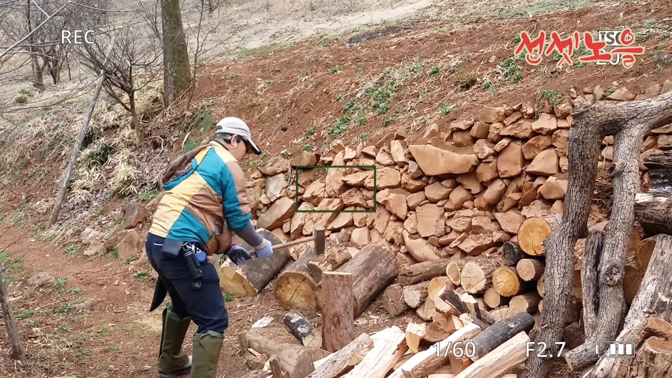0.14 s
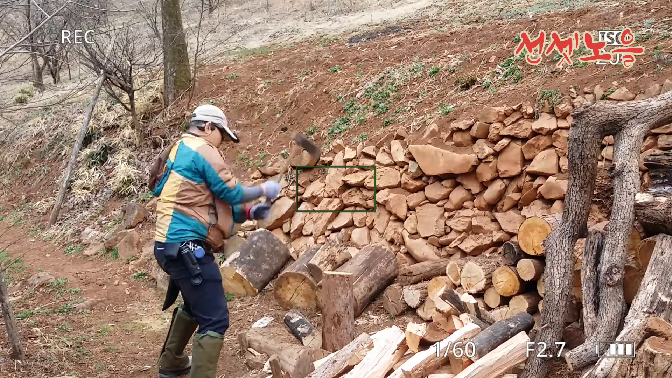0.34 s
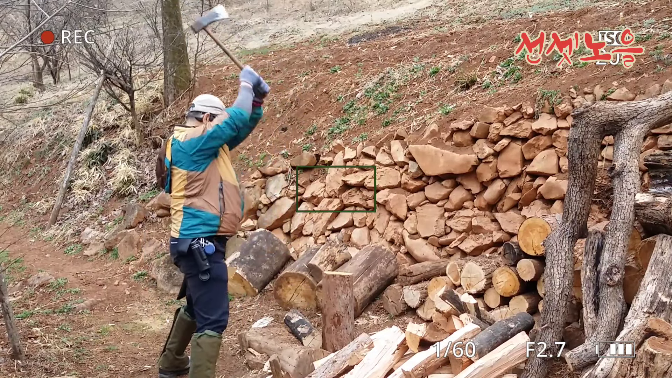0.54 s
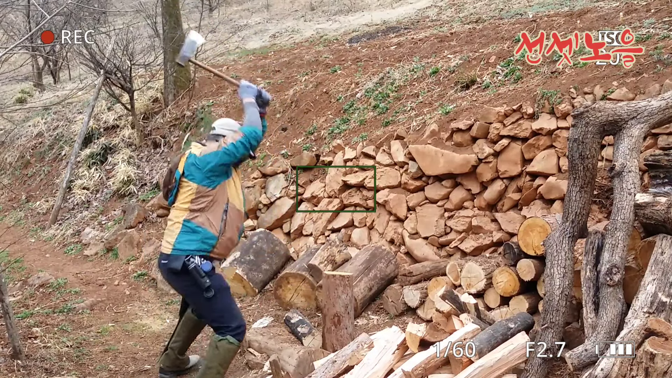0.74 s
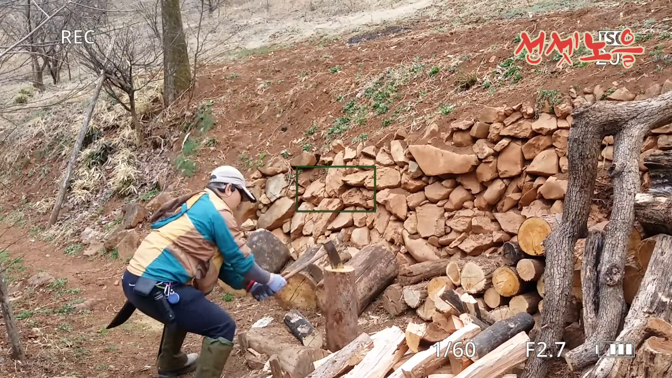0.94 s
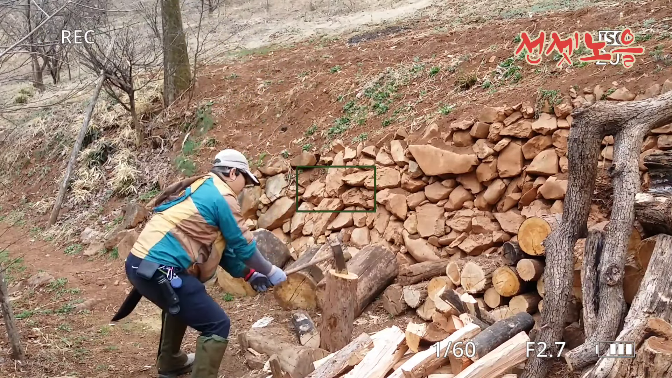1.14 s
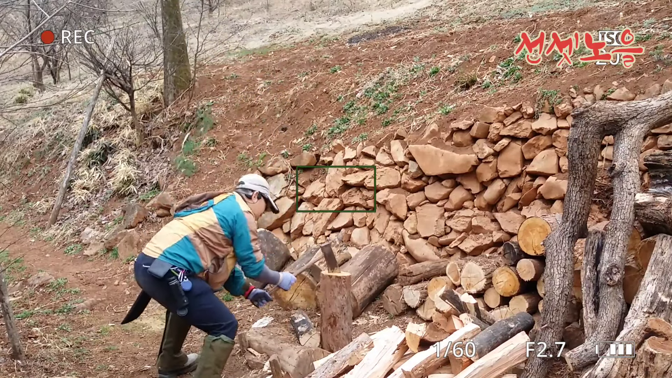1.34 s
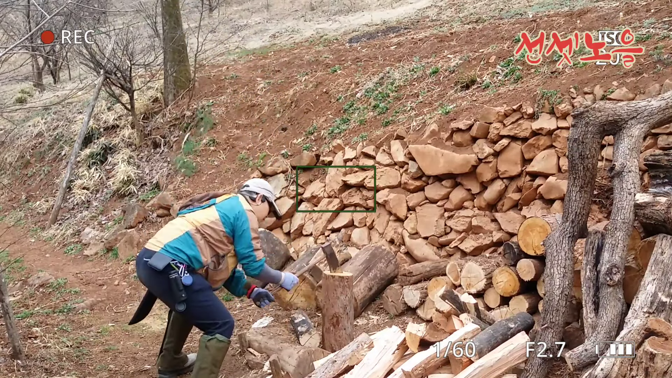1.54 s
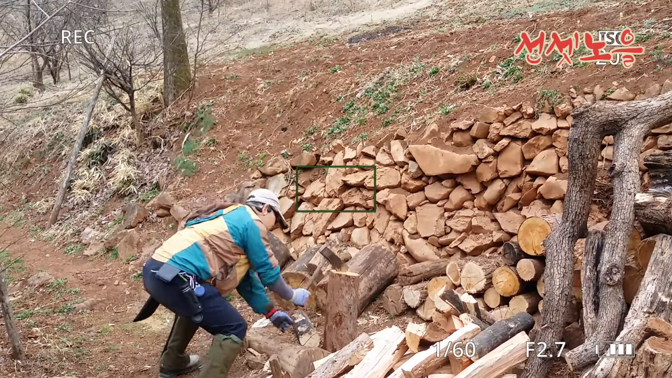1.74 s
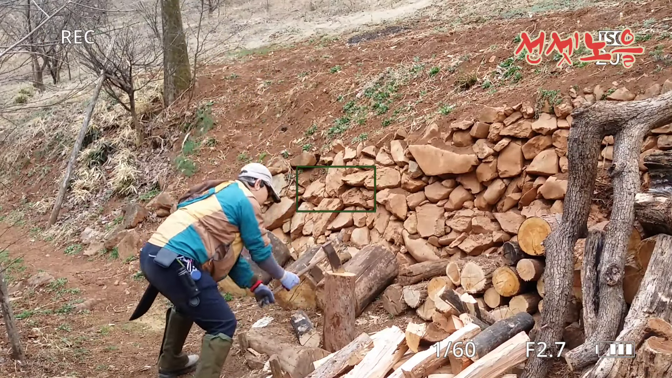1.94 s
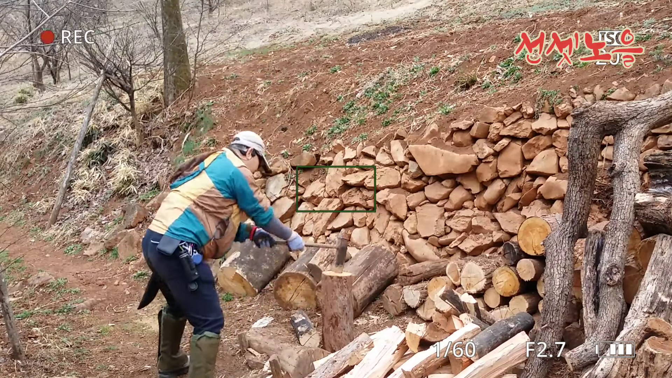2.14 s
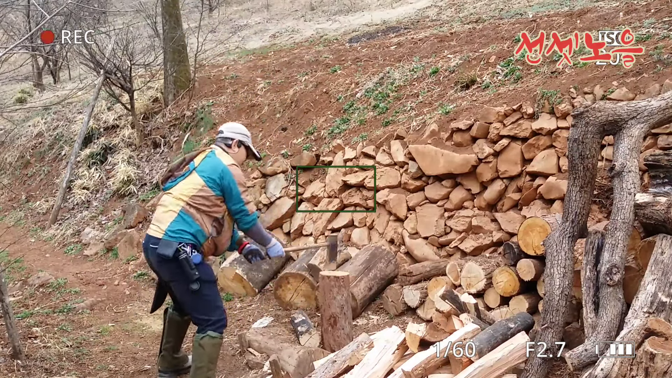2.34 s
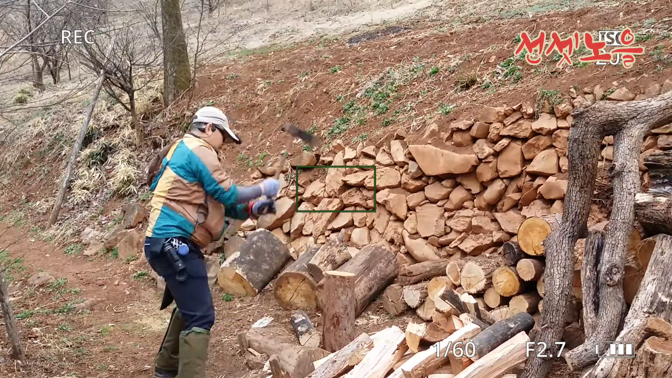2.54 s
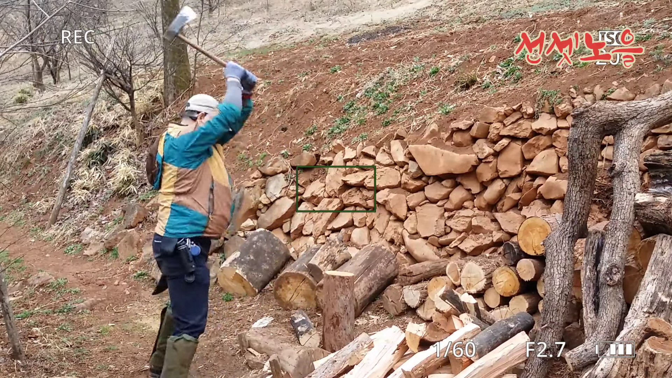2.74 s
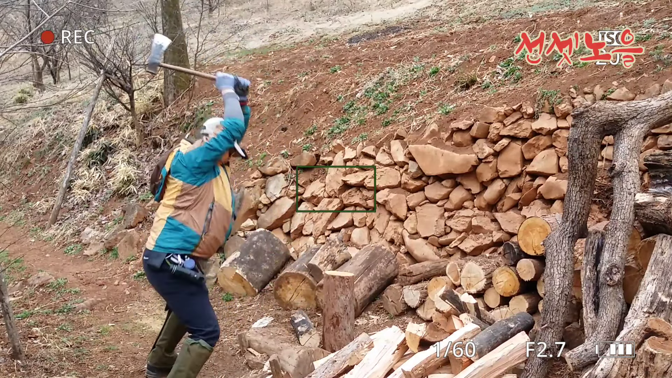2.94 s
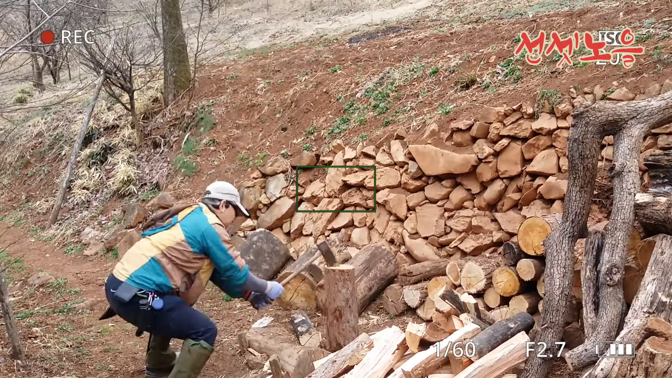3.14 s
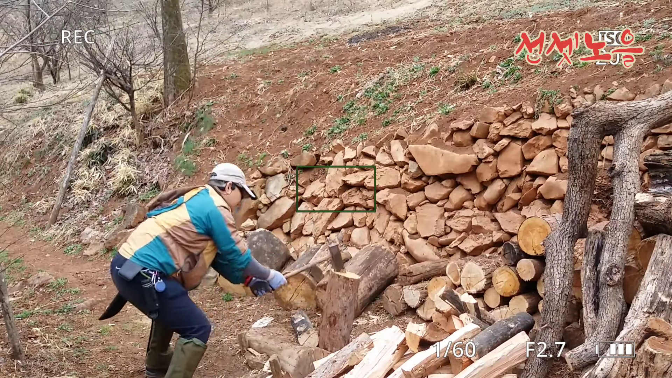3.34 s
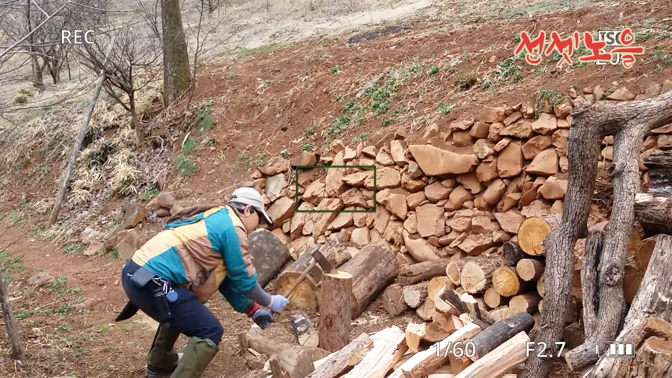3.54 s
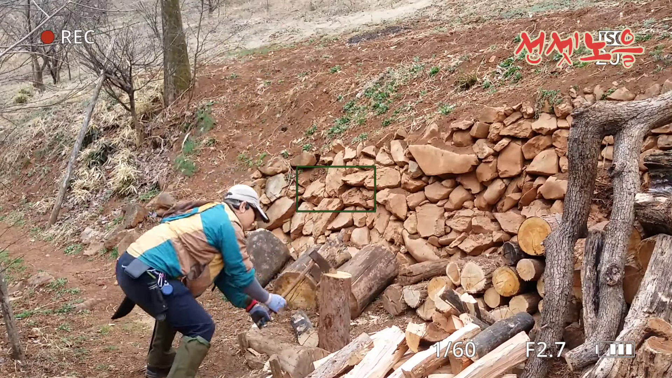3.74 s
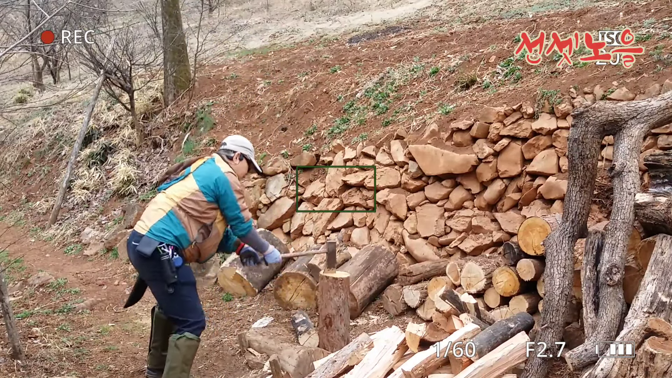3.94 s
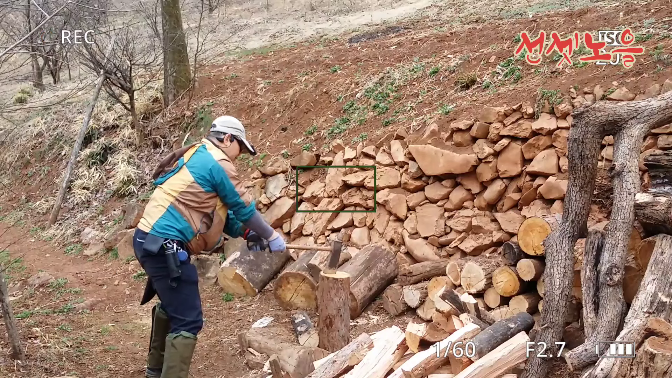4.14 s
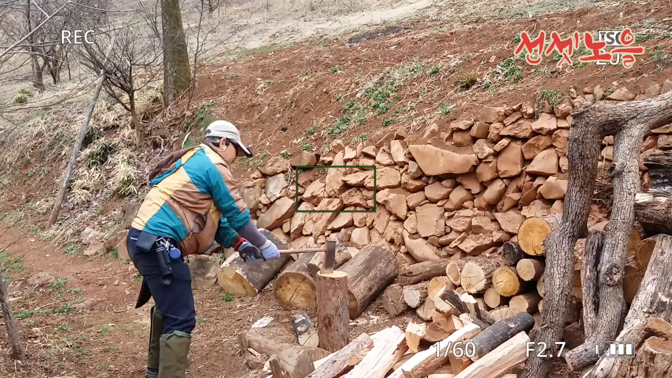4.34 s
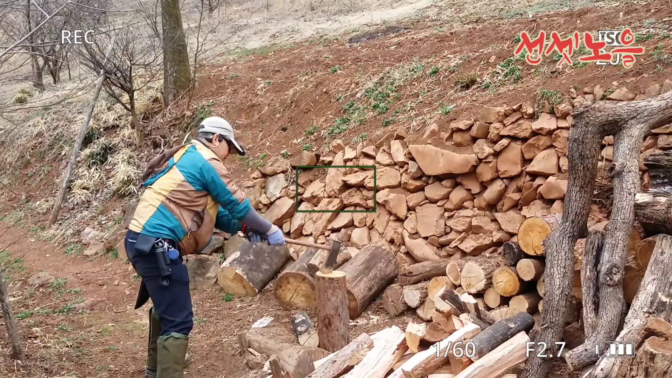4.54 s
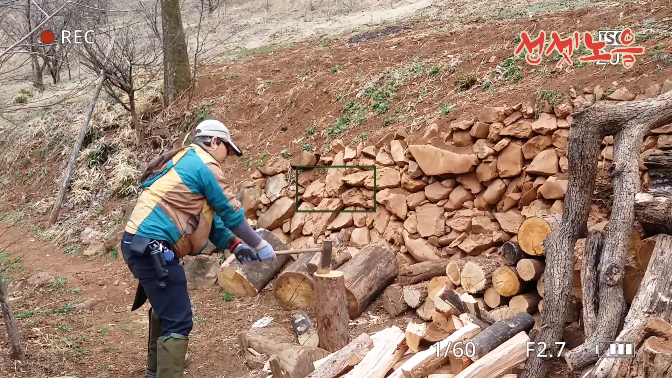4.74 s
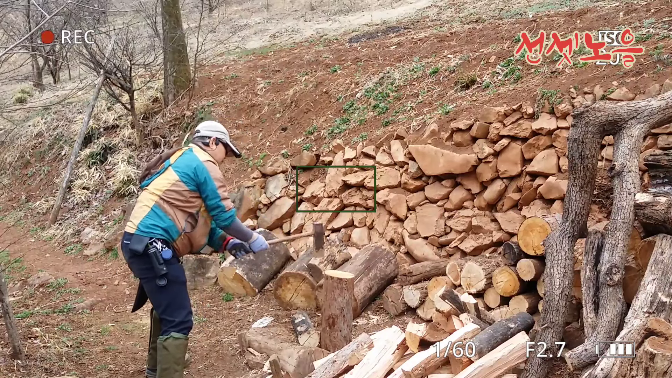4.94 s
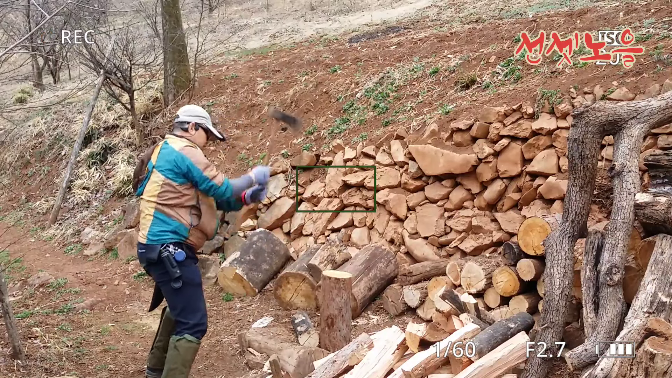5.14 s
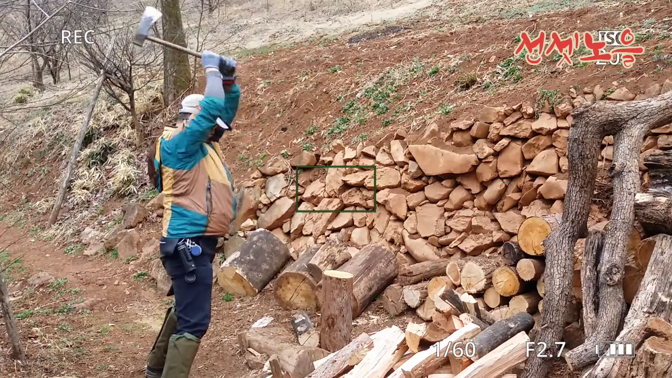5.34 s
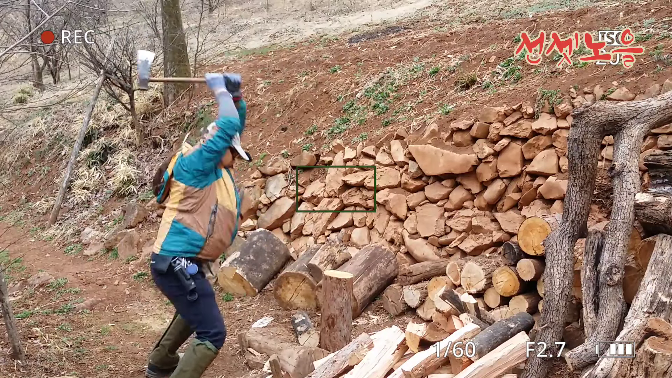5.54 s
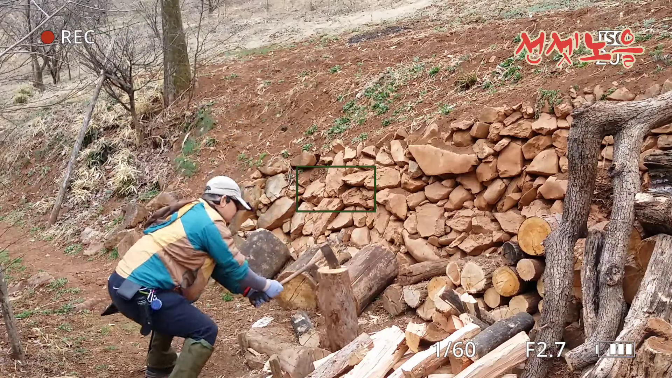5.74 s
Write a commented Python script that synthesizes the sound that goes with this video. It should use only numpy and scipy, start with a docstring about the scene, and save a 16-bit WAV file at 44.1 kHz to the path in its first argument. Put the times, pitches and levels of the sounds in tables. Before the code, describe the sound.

Three sharp axe chops crack through logs in quiet open air, as split pieces drop and wood is handled.

```python
"""Soft puffs of wind and a rustling jacket come first, then an axe splits firewood with three loud blows.
Each blow is a crack of tearing grain, a knock from the log and a thud from the chopping block.
Split halves drop, pieces of wood clack and scrape as they are handled, a foot steps softly, and the
woodpile and slope scatter the sound back. A faint whistle and a squeak pass, and the handle whooshes
on the last swing. The blows overload a small, bright-sounding microphone."""
import sys
import numpy as np
from scipy import signal
from scipy.fft import rfft, irfft, next_fast_len
from scipy.io import wavfile
from scipy.ndimage import map_coordinates

SR = 44100
rng = np.random.default_rng(int(sys.argv[2]) if len(sys.argv) > 2 else 0)


def pcm_store(signal):
    """Save signal as 16-bit PCM."""
    levels = np.round(np.clip(np.atleast_2d(signal), -1, 1) * 32767)
    wavfile.write(sys.argv[1], SR, levels.astype(np.int16).T)


N = 255780

# The tone colour of each noise. Each row: frequency in Hz, relative level in dB.
AIR_COLOUR = [(25, -7), (60, -5.5), (120, -2), (250, -3.5), (450, -11), (800, -15.5), (1700, -23),
              (3500, -21), (5200, -20), (6900, -12.5), (9000, -20.5), (12000, -21.5), (15500, -22.5)]
WIND_COLOUR = [(15, -37.5), (25, -2.5), (97, -0.5), (181, -14), (205, -21.5), (284, -21), (500, -35.5),
               (650, -59), (1100, -120)]
CLOTH_COLOUR = [(120, -30), (200, -2), (1110, -6.5), (1240, -7), (1480, -9), (3830, -11), (5720, -9.5),
                (7240, -1), (8080, -5), (14500, -15), (15600, -21.5)]
CLICK_COLOUR = [(150, -44), (500, -34), (1300, -13.5), (2200, -14), (3200, -11.5), (5500, -10), (7000, 0.5),
                (8600, -2.5), (11000, -12), (15500, -18)]
CRACK_COLOUR = [(300, -31.5), (800, -11.5), (1020, -13), (1600, -6.5), (2150, -11.5), (2700, -3),
                (3700, -7.5), (5500, -6), (6900, 1.5), (8500, -3.5), (11000, -11.5), (15500, -22)]
SPLINTER_COLOUR = [(150, -14.5), (300, 3.5), (600, -2.5), (1000, 4), (1800, -7.5), (4000, -1.5), (7500, 0),
                   (10000, -7.5), (15000, -22)]
# The tone colour of the echo and of the squeak's overtones. Each row: frequency in Hz, gain in dB.
ECHO_COLOUR = [(40, -5.5), (120, 0.5), (300, 2.5), (600, -7.5), (1100, -3), (2000, -4.5), (4000, 2),
               (9000, -1.5), (15000, -3.5)]
SQUEAK_TONE_COLOUR = [(1800, -7), (3500, -12), (5300, -6), (7000, 0), (9000, 4), (10500, -7),
                      (15000, -19.5)]
# How alike left and right are. Each row: frequency in Hz, likeness (1 the same, 0 unrelated, -1 opposite).
AIR_LIKENESS = [(60, 0.6), (300, 0.83), (700, 0.01), (1400, -0.5)]
SNAP_LIKENESS = [(700, 0.96), (1800, 0.24), (3200, 0.083), (5000, 0.27), (9000, 0.44), (14000, 0.17)]
# Balance of the air and of the work at the microphone. Each row: frequency in Hz, left minus right in dB.
AIR_BALANCE = [(100, -1), (1300, 1), (4200, -0.5), (5500, 3.5), (6800, 8), (7700, 7), (9000, -1),
               (13000, 0)]
WORK_BALANCE = [(100, -2), (700, 0.5), (1300, 2), (4200, 0), (5500, 3.5), (6800, 9), (7700, 4), (8800, -7),
                (10500, -0.5), (12500, 0.5)]

# Wind on the microphone. Each row: start in seconds, length in seconds, level in dB.
WIND_PUFFS = [(0, 0.11, -66), (0.33, 0.0088, -42), (0.373, .02, -57), (0.448, .068, -45), (.55, 0.058, -54),
              (0.672, 0.044, -59)]
# Reaching for wood and setting it up. Each row: start in seconds, end in seconds, rustle level in dB.
HANDLING_SPELLS = [(1.35, 1.5, -71), (1.951, 2.5, -73.5), (3.551, 4.059, -65)]
# The jacket's rustle before each blow. Each row: lift level in dB, downswing level in dB.
SWING_LEVELS = [(-59.5, -51), (-65.5, -55), (-67.5, -52.5)]
# The arms take up the axe, raise it and draw it back overhead.
# Each row: seconds before the blow, length in seconds, dB added to the lift level.
LIFT_MOVES = [(0.757, 0.13, -6.5), (0.481, 0.064, 1), (0.29, 0.066, -1)]
# Three sliding tones. Each row: time in seconds, pitch in Hz, level in dB.
SQUEAK_PATH = [(4.805, 2000, -75), (4.814, 1918, -52), (4.822, 1770, -54), (4.83, 1675, -59),
               (4.838, 1840, -63), (4.85, 1833, -80)]
WHISTLE_PATH = [(3.83, 7600, -72), (3.843, 8200, -53), (3.86, 9600, -60), (3.878, 11000, -60),
                (3.893, 14000, -64), (3.908, 16000, -79)]
WHOOSH_PATH = [(5.715, 1052, -78), (5.738, 1185, -51), (5.75, 1290, -56), (5.765, 1400, -83)]

# The notes that ring in a loose piece, a falling half, the block on the soil and the struck log.
# Each row: base frequency in Hz, relative level in dB, seconds to fade by 60 dB.
PIECE_NOTES = [(854, -6.5, 0.027), (1057, -5.5, 0.027), (1170, 0, 0.01), (1670, -7.5, 0.0047),
               (2920, -16.5, 0.015)]
HALF_NOTES = [(173.3, -3, 0.0253), (288.2, 0.5, 0.037), (460, -3, 0.019), (630, -6, .024),
              (792.7, -2.5, 0.03), (1074, -10.5, 0.017), (1524, -6.5, 0.025)]
BLOCK_NOTES = [(42, -14.5, 0.087), (76.5, -3.5, .1), (136, 0, .075), (184, -2.5, 0.055)]
LOG_NOTES = [(310, -15.5, 0.032), (579, -4.5, 0.029), (715, -3.5, 0.026), (850, -4, 0.024),
             (1263, -6, .024), (1552.4, -8.5, 0.022), (1836, -12.5, .026)]
# Wood dragged over wood. Each row: start in seconds, length in seconds, slip in dB, final thump in dB.
DRAGS = [(1.770, 0.0533, -45, -48.5), (3.657, .04, -48, -64)]
# Wood touching wood, and one soft, low footstep (at 2.69 seconds).
# Each row: start in seconds, click in dB, knock in dB, contact in seconds, pitch multiplier.
TOUCHES = [(1.4351, -45, -45.5, 0.0045, 1.06), (1.4867, -47, -60, 0.00054, 0.7),
           (1.7398, -50.5, -51, 0.0042, 0.85), (1.8207, -35, -54, 0.0015, 1.12),
           (1.9627, -46.5, -75, 0.00057, 1.4), (2.267, -40.5, -75, .0005, 1.9),
           (2.358, -64.5, -54, .003, .82), (2.69, -61, -49, .0053, 0.41), (3.562, -56, -46.5, 0.0078, 0.98),
           (3.6519, -24.5, -42, 0.00064, 0.77), (3.6806, -34.5, -26, 0.011, 1.07),
           (3.6944, -22.5, -36, 0.0023, .95), (3.7006, -23, -57, 0.00045, 0.59),
           (3.7058, -22, -34.5, .0006, 1.016), (3.7207, -33, -34, .0012, 1.18),
           (3.761, -45, -72, .0007, .67), (3.7987, -44, -55, 0.0012, .8), (3.9834, -48, -73, .001, 1),
           (4.0825, -23, -24.5, 0.0042, 1.21), (4.1070, -27, -41, 0.0078, 1.06),
           (4.201, -56.5, -55, 0.003, 0.93)]
# A half lands. Each row: start in seconds, click in dB, ring in dB, pitch multiplier,
# brightness in dB per octave.
LANDINGS = [(1.0783, -27, -20, 1.1, -1), (3.3053, -26.5, -18.5, 0.99, -1),
            (4.0838, -30.5, -32.5, 1.685, 0.5)]
# Axe blows. Each row: start in seconds, crack in dB, log ring in dB, thud in dB,
# splitting time in seconds, the log's pitch multiplier, its brightness in dB per octave.
BLOWS = [(0.9753, -5.5, -3, -8.5, 0.0044, .99, -1.75), (3.1989, -6.5, 1.37, -10, .0068, 1.0, 2),
         (5.7938, -6, -1.5, -7.5, 0.0069, 1.28, -2)]

AGE = np.arange(SR // 5) / SR  # seconds since a short sound began


def amp(db):
    """Turn decibels into a gain to multiply by."""
    return 10 ** (np.asarray(db) / 20)


def unit(x):
    """Scale a signal so that its average strength (rms) is 1."""
    return x / np.sqrt(np.mean(x ** 2) + 1e-20)


def along(points, hz):
    """Read between the rows of a frequency table, on a log frequency scale."""
    row_hz, values = np.transpose(points)
    return np.interp(np.log(hz + 1), np.log(row_hz + 1), values)


def wobble(rate, size=N):
    """A smooth curve through `rate` random values a second."""
    points = rng.standard_normal(int(size * rate / SR) + 4)
    return map_coordinates(points, [np.arange(size) * rate / SR])


def filtered(x, response):
    """Scale each frequency in x by the gain that response(hz) gives."""
    length = x.shape[-1]
    padded = next_fast_len(length + SR // 32, real=True)
    return irfft(rfft(x, padded) * response(np.fft.rfftfreq(padded, 1 / SR)), padded)[..., :length]


def noise(colour, shape):
    """Noise of strength 1 with the given tone colour."""
    return unit(filtered(rng.standard_normal(shape), lambda hz: amp(along(colour, hz))))


def sides(balance, hz):
    """Left and right gains that share a level difference evenly."""
    return amp(np.outer([.5, -.5], along(balance, hz)))


def paired(two, likeness):
    """Blend two unrelated signals into a left and right that are partly alike."""
    def blend(hz):
        angle = np.arccos(np.clip(along(likeness, hz), -1, 1)) / 2
        return np.array([np.cos(angle), np.sin(angle)])
    mid, side = filtered(two, blend)
    return np.array([mid + side, mid - side])


def add(track, start, sound):
    """Mix a sound into the track at `start` seconds."""
    part = track[..., round(start * SR):][..., :sound.shape[-1]]
    part += sound[..., :part.shape[-1]]


def swell(start, end, rise, fall):
    """A gain that grows, holds from start to end, then fades; rise and fall are seconds per 20 dB."""
    t = np.arange(N) / SR
    return amp(-20 * (np.maximum(start - t, 0) / rise + np.maximum(t - end, 0) / fall))


def glide(path, jitter, flutter_db, colour=None, harmonics=1):
    """A short sliding tone whose pitch and level tremble."""
    times, pitches, levels = np.transpose(path)
    now = times[0] + AGE
    gain = amp(np.interp(now, times, levels)) * (now < times[-1])
    hz = np.interp(now, times, pitches)
    phase = 2 * np.pi * np.cumsum(hz * (1 + jitter * wobble(1460, len(AGE)))) / SR
    tone = sum(np.sin(k * phase) * (amp(along(colour, k * hz)) if colour else 1)
               for k in range(1, harmonics + 1))
    return gain * unit(tone * amp(flutter_db * wobble(800, len(AGE))))


def ring(notes, pitch, attack, spread_db, bright_db=0):
    """Struck wood rings with a few fading notes; a harder hit (bright_db) favours the high ones."""
    hz, db, t60 = np.transpose(notes)[..., None]
    db = db + bright_db * np.log2(hz / np.median(hz)) + spread_db * rng.standard_normal(hz.shape)
    waves = amp(db - 60 * AGE / t60) * np.sin(2 * np.pi * hz * pitch * AGE)
    together = waves[::2].sum(0) - waves[1::2].sum(0)  # neighbouring notes swing opposite ways
    return together * (1 - np.exp(-AGE / attack))


def snap(colour, hold, t60, attack, grain_db):
    """Breaking fibres make grainy noise for `hold` seconds, which then fades by 60 dB in t60 seconds."""
    shape = amp(-60 * np.maximum(AGE - hold, 0) / t60) * (1 - np.exp(-AGE / attack))
    hiss = paired(noise(colour, (2, len(AGE))), SNAP_LIKENESS)
    grain = amp(grain_db * wobble(2000, len(AGE)))
    return unit(shape * hiss * grain) * np.sqrt(np.mean(shape ** 2))  # the shape alone sets the energy


def outdoors(hit, echo_db, t60, build):
    """A sound plus its short, blurred echo from the woodpile, stones and slope."""
    tail = rng.standard_normal((2, len(AGE))) * amp(-60 * AGE / t60) * (1 - np.exp(-(AGE / build) ** 2))
    tail = paired(tail / np.linalg.norm(tail[0]), [(150, 0.97), (600, .6), (1500, .1), (4000, 0.066)])
    tail = filtered(tail, lambda hz: amp(along(ECHO_COLOUR, hz)))
    return hit + amp(echo_db) * signal.fftconvolve(hit, tail, axes=1)[:, :hit.shape[-1]]


def air():
    """Still hillside air and microphone hiss, with a few lumpy puffs of wind on the microphone."""
    calm = paired(noise(AIR_COLOUR, (2, N)), AIR_LIKENESS)
    calm = filtered(calm, lambda hz: sides(AIR_BALANCE, hz))
    puffs = [amp(db) * swell(start, start + length, rise=0.57 * length, fall=1.1 * length)
             for start, length, db in WIND_PUFFS]
    lumps = amp(wobble(rate=34.7))  # about 1 dB up and down
    wind = np.linalg.norm(puffs, axis=0) * lumps * noise(WIND_COLOUR, N)
    return amp(-65.5 + 0.37 * wobble(0.6)) * unit(calm) + wind


def jacket():
    """Sleeves rub with a fine grain whenever the arms move, loudest on the downswing."""
    slow = dict(rise=0.184, fall=0.14)
    moves = [amp(db) * swell(start, end, **slow) for start, end, db in HANDLING_SPELLS]
    moves.append(np.full(N, amp(-74.5)))  # the jacket is never quite still
    for (blow, *_), (lift_db, down_db) in zip(BLOWS, SWING_LEVELS):
        for lead, length, db in LIFT_MOVES:
            moves.append(amp(lift_db + db) * swell(blow - lead, blow - lead + length, **slow))
        moves.append(amp(down_db) * swell(blow - 0.091, blow, rise=0.065, fall=0.27))
    rub = paired(noise(CLOTH_COLOUR, (2, N)), [(300, 0.25), (2000, 0.94), (8000, .3)])
    grain = amp(1.4 * wobble(60) + 1.4 * wobble(1500))
    return np.linalg.norm(moves, axis=0) * unit(rub * grain)


def squeak_and_whistle():
    """A brief raspy squeak and, earlier, a faint whistle that sweeps upward."""
    out = np.zeros((2, N))
    squeak = glide(SQUEAK_PATH, jitter=0.024, flutter_db=3, colour=SQUEAK_TONE_COLOUR, harmonics=8)
    rasp = amp(-6.5) * np.abs(squeak) * noise(CRACK_COLOUR, (2, len(AGE)))
    add(out, SQUEAK_PATH[0][0], outdoors(squeak + rasp, echo_db=-6.5, t60=0.083, build=.004))
    add(out, WHISTLE_PATH[0][0], glide(WHISTLE_PATH, jitter=.035, flutter_db=4))
    return out


def whoosh():
    """Air swirling behind the handle sings higher as the last swing speeds up."""
    out = np.zeros((2, N))
    add(out, WHOOSH_PATH[0][0], glide(WHOOSH_PATH, jitter=0.11, flutter_db=4))
    return out


def tap(click_db, knock_db, contact, pitch):
    """One light touch: a click and a short wooden ring."""
    click = amp(click_db) * snap(CLICK_COLOUR, hold=contact, t60=0.013, attack=0.00006, grain_db=2.5)
    knock = amp(knock_db) * ring(PIECE_NOTES, pitch, attack=0.00047, spread_db=4)
    return outdoors(click + knock, echo_db=-9, t60=0.099, build=0.0013)


def bark_ticks():
    """Bits of bark tick faintly at random moments while the wood is handled."""
    out = np.zeros((2, N))
    ticks_per_second = 7
    for start, end, _ in HANDLING_SPELLS:
        for when, strength in rng.random((round((end - start) * ticks_per_second), 2)):
            db = -60.5 + 2 * strength
            add(out, start + when * (end - start), tap(db, db - 5, contact=.0015, pitch=.85))
    return out


def scrapes():
    """A dragged piece sticks and slips unevenly, hardly ringing, then settles with a soft thump."""
    out = np.zeros((2, N))
    gap = 0.0095  # average seconds between slips
    for start, length, db, thump_db in DRAGS:
        slips = np.arange(start, start + length, gap)
        for when, (late, strength) in zip(slips, rng.standard_normal((len(slips), 2))):
            slip_db = db + 1.5 * strength
            add(out, when + 0.13 * gap * late, tap(slip_db, slip_db - 9, contact=0.0048, pitch=0.744))
        thump = amp(thump_db) * ring(BLOCK_NOTES, pitch=0.83, attack=0.0088, spread_db=3)
        add(out, start + length, thump)
    return out


def clacks_and_footstep():
    """Wood clacks on wood as the next log is set up; one soft, low clack stands for a footstep."""
    out = np.zeros((2, N))
    for start, *touch in TOUCHES:
        add(out, start, tap(*touch))
    return out


def landing(click_db, ring_db, pitch, bright_db):
    """A split half clicks and rings as it meets the ground or the block."""
    click = amp(click_db) * snap(CLICK_COLOUR, hold=0.0016, t60=0.025, attack=0.00034, grain_db=1.5)
    body = amp(ring_db) * ring(HALF_NOTES, pitch, attack=.002, spread_db=2, bright_db=bright_db)
    return outdoors(click + body, echo_db=-20.5, t60=0.11, build=0.0091)


def falling_halves():
    """Each half lands, then tips onto its other edge with a softer, duller knock."""
    out = np.zeros((2, N))
    for start, click_db, ring_db, pitch, bright_db in LANDINGS:
        add(out, start, landing(click_db, ring_db, pitch, bright_db))
        add(out, start + 0.0245, landing(click_db - 25.5, ring_db - 22.5, pitch * 0.92, bright_db - 2.5))
    return out


def axe_blows():
    """The blade tears the grain, the log rings, the block thumps the soil and splinters crackle."""
    out = np.zeros((2, N))
    for start, crack_db, log_db, thud_db, splitting, pitch, bright_db in BLOWS:
        crack = amp(crack_db) * snap(CRACK_COLOUR, splitting, t60=0.028, attack=0.0002, grain_db=2.5)
        knock = amp(log_db) * ring(LOG_NOTES, pitch, attack=0.00077, spread_db=2, bright_db=bright_db)
        thud = amp(thud_db) * ring(BLOCK_NOTES, pitch=0.93, attack=.006, spread_db=-0.5)
        add(out, start, outdoors(crack + knock + thud, echo_db=-17.5, t60=0.18, build=0.008))
        splinters = snap(SPLINTER_COLOUR, hold=0.02, t60=0.065, attack=.004, grain_db=4)
        add(out, start + .012, amp(crack_db - 21.5) * splinters)
    return out


def scene():
    """The work and the air reach a microphone whose two sides favour different high frequencies."""
    knocks = axe_blows() + falling_halves() + clacks_and_footstep() + scrapes() + bark_ticks()
    work = knocks + squeak_and_whistle() + whoosh() + jacket()
    return filtered(work, lambda hz: sides(WORK_BALANCE, hz)) + air()


def record(dry):
    """The blows overload the microphone, which flattens their peaks; the highest treble is cut off."""
    top_hz = 15750
    flattened = np.clip(dry, -1, 1)
    return filtered(flattened, lambda hz: 1 / np.sqrt(1 + (hz / top_hz) ** 120))


dry = scene()
out = record(dry)
pcm_store(out)
```